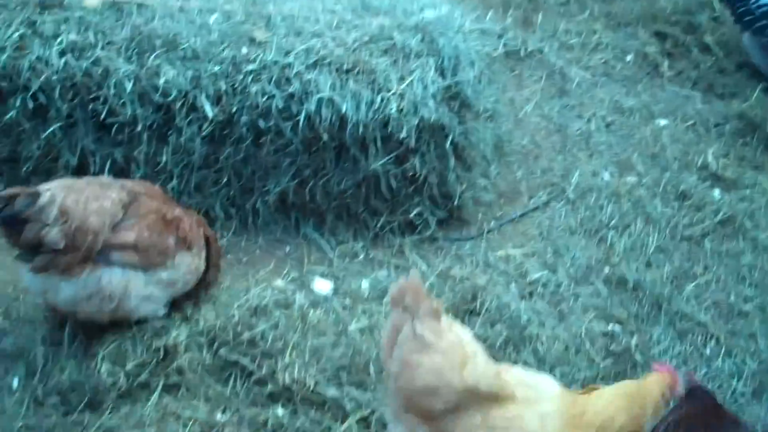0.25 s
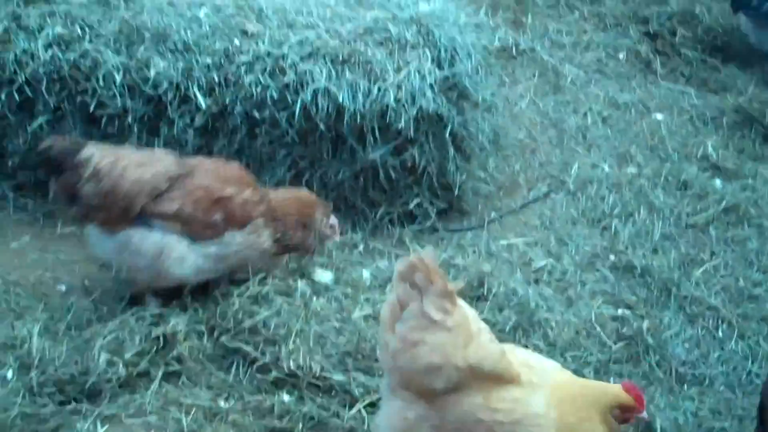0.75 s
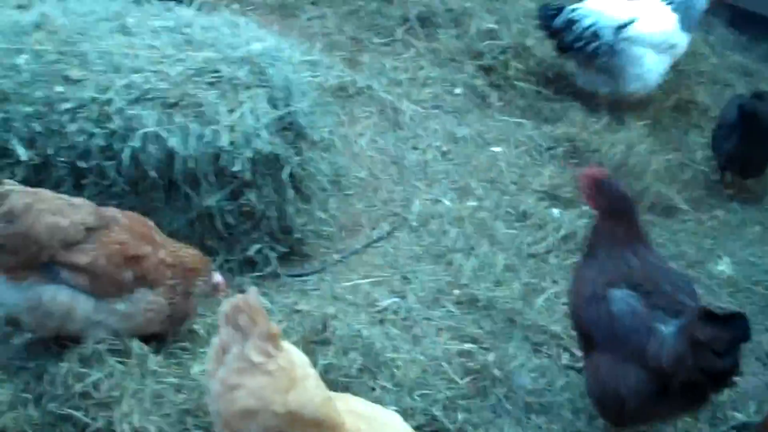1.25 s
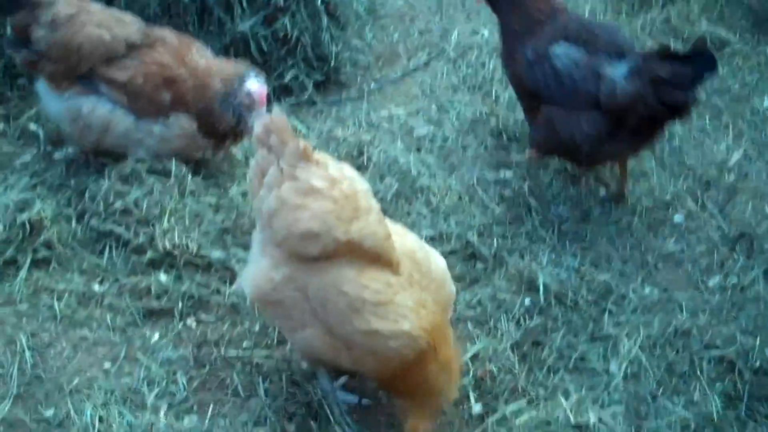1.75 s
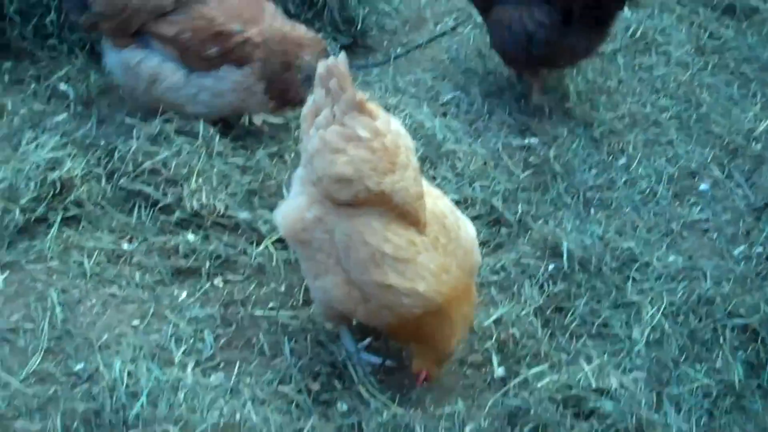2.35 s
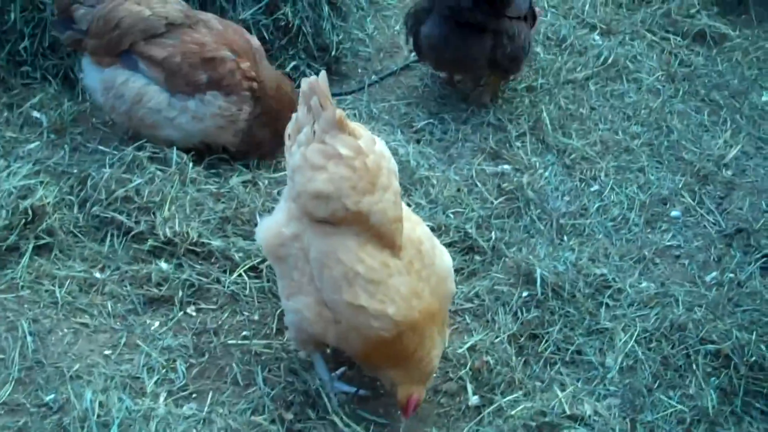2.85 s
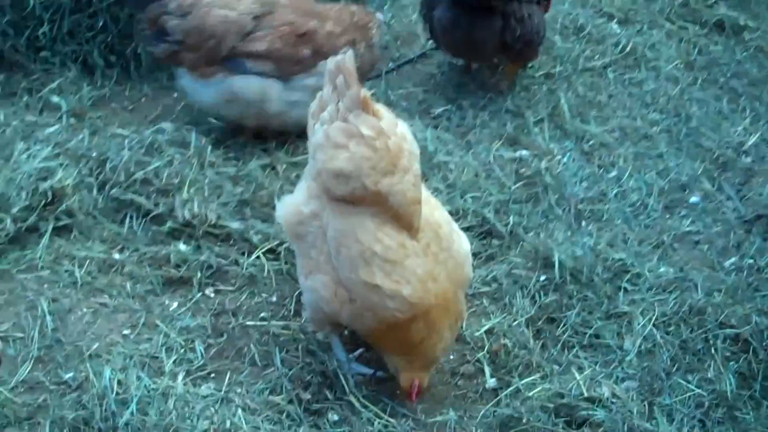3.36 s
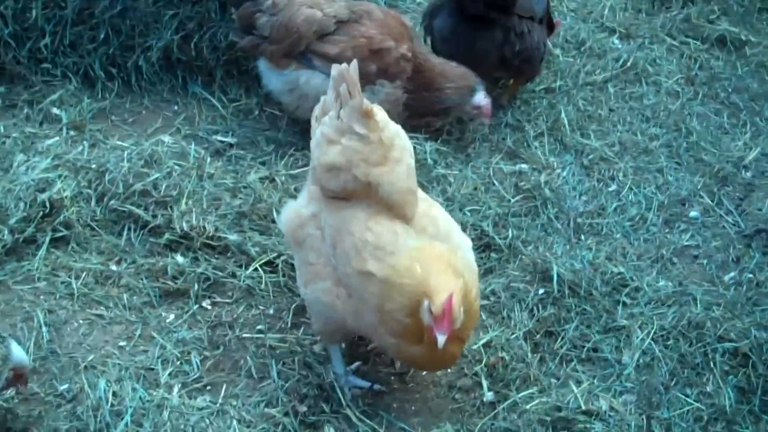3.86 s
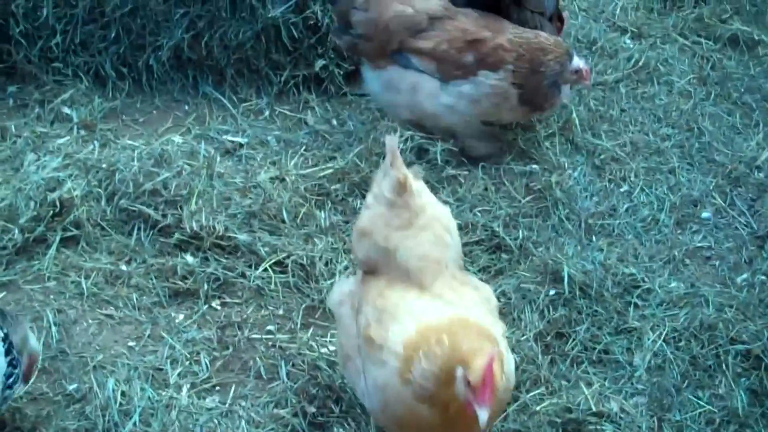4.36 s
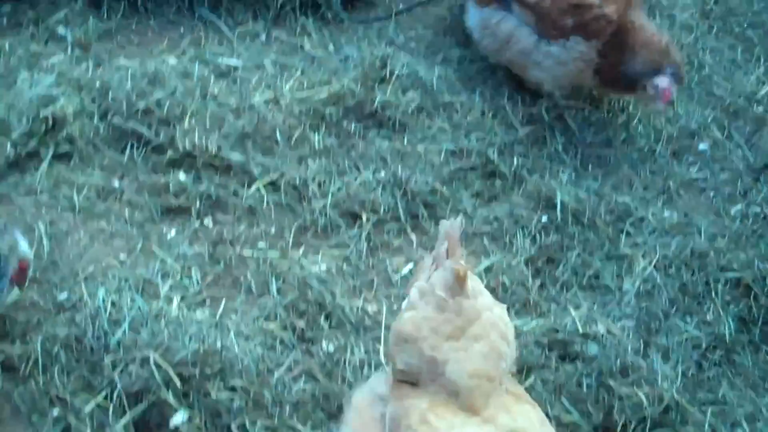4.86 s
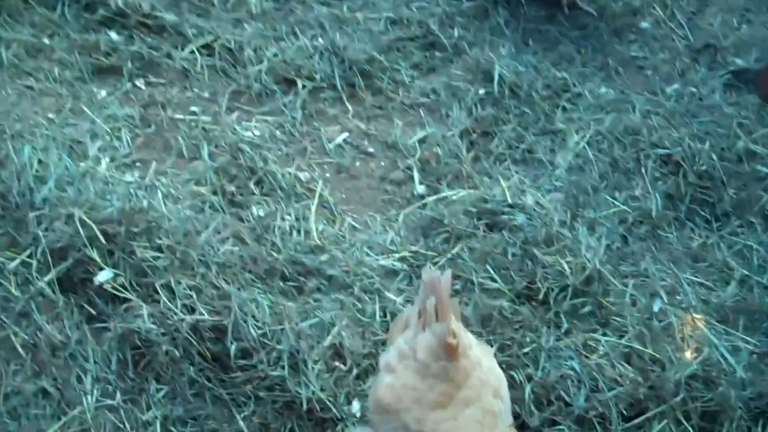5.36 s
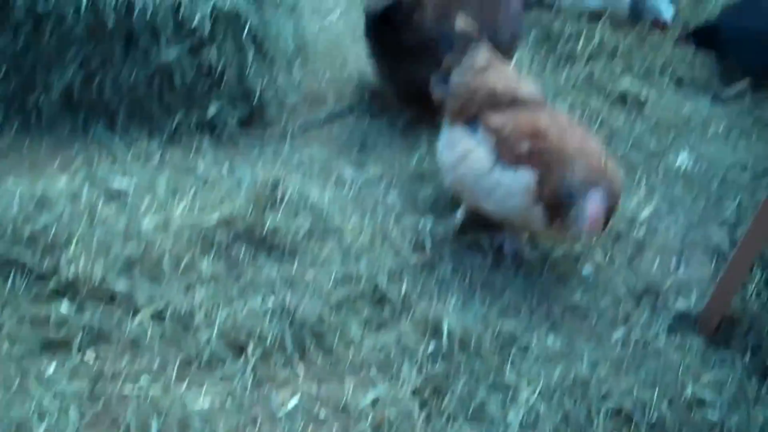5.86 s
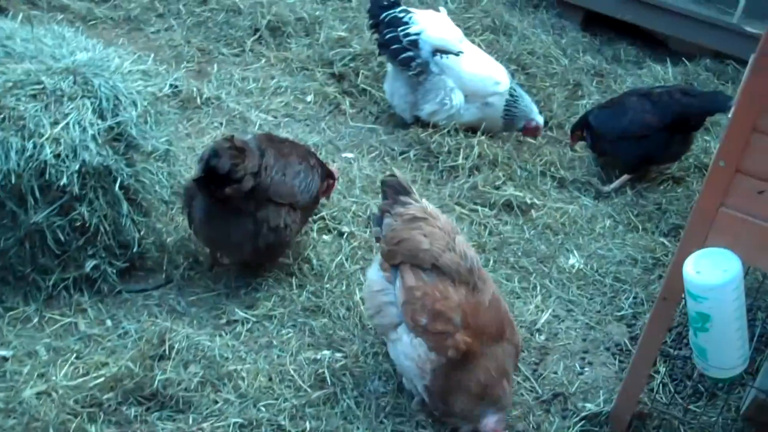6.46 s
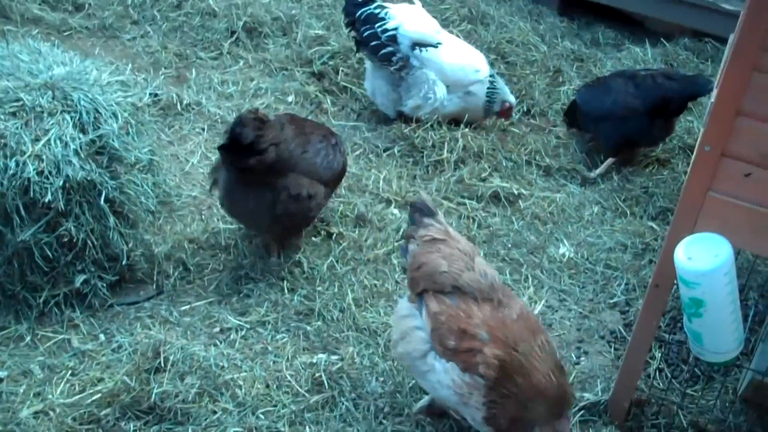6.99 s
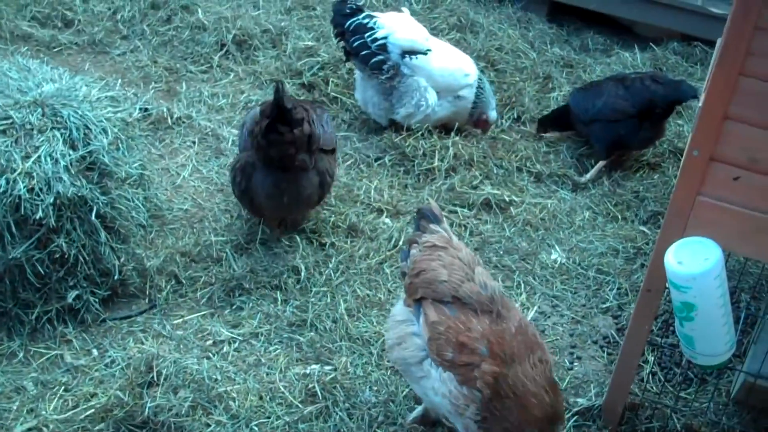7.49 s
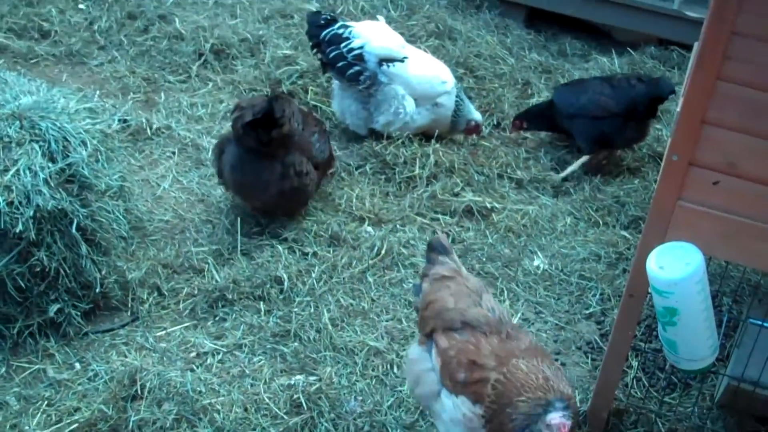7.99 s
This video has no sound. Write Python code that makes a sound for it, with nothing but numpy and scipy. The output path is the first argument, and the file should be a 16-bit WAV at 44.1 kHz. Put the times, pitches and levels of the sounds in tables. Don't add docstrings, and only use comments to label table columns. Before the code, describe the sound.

Hens scratch through crackling hay, giving hoarse barks, a low moan, a sobbing wail and a quick trill, with soft hiss behind.

```python
import sys
import numpy as np
from scipy import signal
from scipy.fft import rfft, irfft
from scipy.io import wavfile
from scipy.ndimage import uniform_filter1d

SR = 44100
rng = np.random.default_rng(int(sys.argv[2]) if len(sys.argv) > 2 else 0)


def volts(x):
    e = np.asarray(x, float) / 20
    return 10 ** e


def digitize_waveform(pressure):
    field = np.atleast_2d(pressure).T
    bounded = np.clip(field, -1, 1)
    quanta = np.round(bounded * 32767).astype(np.int16)
    wavfile.write(sys.argv[1], SR, quanta)


N = 362943
TIME = np.arange(N) / SR
PORT_LAG = 2

STACK = (1, 2, 3, 4)
CLEAR = dict(wobble=.012, shimmer_db=1.4, rough=.13)
PURE = dict(wobble=.006, shimmer_db=.6, rough=.08)


def walk(rate_hz, size=N):
    hold = int(SR / rate_hz)
    steps = np.repeat(rng.standard_normal(size // hold + 1), hold)
    return 1.3 * uniform_filter1d(uniform_filter1d(steps, hold), hold)[:size]


def notes(tables, orders, wobble, shimmer_db, rough):
    rows = np.concatenate(tables)
    a, b = int(rows[0, 0] * SR) - 400, int(rows[-1, 0] * SR) + 400
    size, t = b - a, TIME[a:b]
    gate, out = np.zeros(N), np.zeros(N)
    for table in tables:
        gate[int(table[0][0] * SR):int(table[-1][0] * SR) + 60] = 1
    hz = uniform_filter1d(np.interp(t, rows[:, 0], rows[:, 1]), size=100)
    hz = hz * (1 + wobble * walk(150, size))
    phase = 2 * np.pi * np.cumsum(hz) / SR
    haze = 1 + rough * walk(500, size)
    for k, level_db in zip(orders, rows[:, 2:].T):
        swell = uniform_filter1d(gate[a:b] * np.interp(t, rows[:, 0], volts(level_db)), size=150)
        shimmer = volts(shimmer_db * walk(70, size))
        out[a:b] += np.sqrt(2) * haze * swell * shimmer * np.sin(k * phase)
    return out


def partials(pitch, db, mouth, orders, mouth_width_hz, steep, low_db):
    levels = []
    for k in orders:
        offset = 2 * (k * pitch - mouth) / mouth_width_hz
        levels.append(db + low_db * (k == 1) - steep * 10 * np.log10(1 + offset ** 2))
    return levels


def voice(rows, orders, glide, peak, edge_db, flat, mouth_width_hz, steep, low_db, **steadiness):
    u = np.linspace(0, 1, num=17)
    swell = edge_db * np.where(u < peak, 1 - u / peak, (u - peak) / (1 - peak)) ** flat
    next_starts = [r[0] for r in rows[1:]] + [TIME[-1]]
    tables = []
    for (s, length, hz, db, mouth), after in zip(rows, next_starts):
        t = s + u * min(length, after - s - 1 / SR)
        pitch = hz * (1 + glide(u, hz))
        levels = partials(pitch, db + swell, mouth, orders, mouth_width_hz, steep, low_db)
        tables.append(np.transpose([t, pitch, *levels]))
    return notes(tables, orders, **steadiness)


def lift(by):
    return lambda u, hz: by * u


def breaks(u, hz):
    scoop = .35 * np.exp(-u / .15)
    flip = 1 / (1 + np.exp((.69 - u) / .05))
    return (500 / hz - 1) * (scoop + flip)


def clucks():
    # t/s, f/Hz, level/dB, mouth/Hz
    long_cluck = [(.575, 400, -52, 760), (.597, 347, -30, 700), (.607, 337, -36, 760), (.62, 356, -35, 710),
                  (.64, 352, -38, 710), (.665, 330, -36.5, 850), (.695, 354, -38, 720),
                  (.735, 448, -45, 850), (.757, 455, -62, 880)]
    # t/s, length/s, f/Hz, level/dB, mouth/Hz
    level_clucks = [
        (1.718, .048, 300, -46, 620),
        (1.766, .046, 289, -49, 1150),
        (1.795, .045, 300, -49, 900),
        (1.86, .046, 289, -39.5, 1160),
    ]
    murmurs = [
        (1.764, .058, 324, -51, 650),
        (1.822, .04, 318, -56, 640),
        (5.61, .03, 475, -50, 950),
    ]
    low_barks = [
        (1.5525, .031, 240, -28.5, 770),
        (1.7055, .012, 240, -32, 720),
    ]
    wide = [
        (5.373, .05, 319, -31.5, 1140),
        (5.452, .095, 322, -34.5, 1020),
    ]
    s, hz, db, mouth = np.transpose(long_cluck)
    levels = partials(hz, db, mouth, STACK, mouth_width_hz=190, steep=1.05, low_db=.3)
    out = notes([np.transpose([s, hz, *levels])], STACK, **CLEAR)
    out += voice(level_clucks, STACK, lift(.01), peak=.4, edge_db=-10, flat=3.1, mouth_width_hz=150,
                 steep=.95, low_db=-6, wobble=.015, shimmer_db=2.1, rough=.25)
    out += voice(murmurs, (2, 5), lift(.01), peak=.35, edge_db=-8, flat=2.5, mouth_width_hz=900,
                 steep=.7, low_db=0, **CLEAR)
    out += voice(low_barks, (1, 2, 3, 4, 5, 6, 7), lift(.04), peak=.45, edge_db=-20, flat=2.6,
                 mouth_width_hz=230, steep=1.45, low_db=-6, wobble=.05, shimmer_db=3.5, rough=.5)
    return out + voice(wide, STACK, lift(.005), peak=.27, edge_db=-26, flat=1.1, mouth_width_hz=330,
                       steep=1.4, low_db=-2.5, **CLEAR)


def yelps():
    # t/s, length/s, f/Hz, level/dB, mouth/Hz
    full = [
        (6.965, .05, 362, -28.5, 900),
    ]
    dying = [
        (7.115, .056, 447, -29.5, 910),
    ]
    leading = [
        (7.322, .05, 357, -28.5, 900),
    ]
    out = voice(full, (1, 2, 3, 4, 5), breaks, peak=.74, edge_db=-24, flat=4.5, mouth_width_hz=300,
                steep=1.35, low_db=-6, **CLEAR)
    out += voice(dying, (1, 2, 3), breaks, peak=.46, edge_db=-34, flat=3.1, mouth_width_hz=300,
                 steep=1.5, low_db=-10, **PURE)
    return out + voice(leading, (2, 4), breaks, peak=.76, edge_db=-20, flat=3.5, mouth_width_hz=480,
                       steep=2.9, low_db=-9, **PURE)


def wail():
    # t/s, f/Hz, level/dB
    rough_line = [
        (5.795, 1123, -43),
        (5.805, 1079, -34),
        (5.871, 1051, -35),
        (5.887, 1102, -40),
        (5.9, 1103, -36),
    ]
    # t/s, f/Hz, level/dB
    clear_lines = [
        [(5.9, 1069, -37), (5.908, 1034, -30), (5.922, 1027, -29), (5.944, 1072, -35), (5.962, 1070, -41)],
        [(5.962, 1025, -41), (5.968, 1017, -33), (5.982, 1018, -32), (6.006, 1072, -29), (6.024, 1072, -32),
         (6.045, 1034, -38)],
        [(6.045, 1006, -39), (6.071, 1038, -38), (6.083, 1024, -38), (6.095, 1038, -49), (6.119, 1017, -49),
         (6.135, 1049, -66)],
    ]

    def stack(rows, over_db):
        table = []
        for s, hz, db in rows:
            fourth_db = db - 10 + 1.6 * (db + 40) - 27
            table.append((s, hz / 2, db, fourth_db, *(db + o for o in over_db)))
        return np.array(table)

    rough = notes([stack(rough_line, (-19, -31, -16, -17, -22))], (2, 4, 1, .5, 1.5, 2.5, 3.5),
                  wobble=.014, shimmer_db=1.6, rough=.25)
    clear = notes([stack(rows, (-24,)) for rows in clear_lines], (2, 4, 1),
                  wobble=.005, shimmer_db=.7, rough=.1)
    return rough + clear


def sobs():
    # t/s, length/s, f/Hz, level/dB, mouth/Hz
    sagging = [
        (5.643, .019, 760, -46, 1400),
        (5.662, .038, 680, -24.5, 1220),
        (5.7, .027, 690, -44, 1330),
        (5.724, .047, 665, -27.5, 1180),
    ]
    drone = [
        (5.772, .029, 618, -35, 1240),
    ]
    falling = [
        (6.172, .07, 545, -31.5, 1070),
    ]
    # t/s, f/Hz, level/dB
    under = [(5.613, 800, -59), (5.642, 735, -41), (5.66, 690, -37), (5.677, 640, -60), (5.707, 668, -41),
             (5.74, 600, -62), (5.79, 618, -46), (5.812, 545, -52), (5.98, 510, -58)]
    out = voice(sagging, (2, 3), lambda u, hz: -.13 * (1 - np.exp(-u / .35)), peak=.36, edge_db=-18,
                flat=1.6, mouth_width_hz=260, steep=2.1, low_db=-9, **PURE)
    out += voice(drone, (1, 2, 4), lift(-.01), peak=.3, edge_db=-6, flat=3.5, mouth_width_hz=130,
                 steep=1.2, low_db=-3.5, wobble=.02, shimmer_db=1.4, rough=.28)
    out += voice(falling, STACK, lift(-.19), peak=.16, edge_db=-20, flat=1.3, mouth_width_hz=240,
                 steep=.9, low_db=1.5, **CLEAR)
    return out + notes([under], (1,), **CLEAR)


def trill():
    # t/s, length/s, f/Hz, level/dB
    trill_beats = [
        (7.4, .049, 442, -28.5),
        (7.467, .039, 453, -29),
        (7.52, .043, 466, -29),
        (7.579, .028, 477, -36),
        (7.608, .033, 470, -51),
    ]
    squeak_ratio, squeak_db = 1.42, -46
    beats = [(s, n, hz, db, 2 * hz) for s, n, hz, db in trill_beats]
    ends = [7.374] + [s + n for s, n, *_ in trill_beats]
    squeaks = []
    for end, (s, _, hz, _) in zip(ends, trill_beats[:-1]):
        squeaks.append((end, s - end, squeak_ratio * hz, squeak_db, 2 * squeak_ratio * hz))
    out = voice(beats, (2,), lambda u, hz: .28 * (u - .33) ** 2, peak=.5, edge_db=-19, flat=3.3,
                mouth_width_hz=400, steep=.9, low_db=-9, **PURE)
    out += voice(squeaks[:1], (2,), lambda u, hz: .13 * np.sin(3.0 * u) - .03, peak=.45, edge_db=-4,
                 flat=2.1, mouth_width_hz=600, steep=.9, low_db=-9, **PURE)
    return out + voice(squeaks[1:], (2,), lift(-.1), peak=.55, edge_db=-5, flat=2.1,
                       mouth_width_hz=600, steep=.9, low_db=-9, **PURE)


def moan():
    # t/s, length/s, f/Hz, level/dB, mouth/Hz
    moan_notes = [(1.95, .13, 392, -55, 1180), (2.085, .075, 345, -48, 1040), (2.16, .05, 372, -53, 1130),
                  (2.25, .08, 385, -55, 1150), (2.33, .09, 352, -55, 1060), (2.44, .13, 363, -55, 1090),
                  (2.585, .065, 380, -52, 1140)]
    # t/s, f/Hz, level/dB
    creak = [(1.85, 610, -54), (1.89, 580, -48), (1.905, 620, -38), (1.917, 690, -42), (1.926, 930, -39),
             (1.936, 940, -44), (1.941, 830, -42), (1.952, 800, -60)]
    out = voice(moan_notes, (1, 2, 3, 4, 5), lift(.03), peak=.35, edge_db=-4, flat=2.1, mouth_width_hz=330,
                steep=.9, low_db=-1.5, wobble=.013, shimmer_db=2.5, rough=.35)
    return volts(-1.1) * out + notes([creak], (1,), **CLEAR)


def band(x, hz, width_hz):
    return signal.lfilter(*signal.iirpeak(min(hz, .44 * SR), hz / width_hz, fs=SR), x)


def growls(tables, jitter, scatter_db, breath):
    # f/Hz, width/Hz, level/dB
    throat = [
        [(330, 180, -4), (510, 170, -1), (700, 200, 0)],
        [(900, 180, -2), (1150, 260, 0)],
        [(1500, 240, -3), (1780, 300, 4.5)],
    ]
    pulse_hz = 128
    out = np.zeros(N)
    for table in tables:
        s, db, *over_db = np.transpose(table)
        a, b = int(s[0] * SR), int(s[-1] * SR)
        size, t = b - a, TIME[a:b]
        drift = 1 + .06 * walk(20, size) + jitter * walk(150, size)
        phase = np.cumsum(pulse_hz * drift) / SR
        pulses = np.diff(np.floor(phase), prepend=0) * volts(scatter_db * rng.standard_normal(size))
        air = np.exp(-(phase % 1) / .4) * rng.standard_normal(size)
        source = pulses + breath * air
        fade = signal.windows.tukey(size, 400 / size)
        for modes, part_db in zip(throat, (db, db + over_db[0], db + over_db[1])):
            part = np.zeros(size)
            for k, (f, w, g) in enumerate(modes):
                part += (-1) ** k * volts(g) * band(band(source, f, w), f, w)
            out[a:b] += part / np.std(part) * volts(np.interp(t, s, part_db)) * fade
    return out


def held(rows, attack_s, release_s, edge_db):
    tables = []
    for s, n, db, *over in rows:
        up = min(attack_s, n / 2)
        steps = ((0, edge_db), (up, 0), (max(n - release_s, up + 1 / SR), 0), (n, edge_db))
        tables.append([(s + t, db + d, *over) for t, d in steps])
    return tables


def throaty():
    # t/s, length/s, low throat level/dB, middle over low/dB, upper over low/dB
    hoarse_rows = [
        (1.95, .35, -56, 4, -2),
        (2.3, .355, -58, 1, -1),
        (4.7, .65, -61, 3, 0),
    ]
    rasp_rows = [
        (.58, .18, -57, 2, 3),
        (1.755, .195, -56, 3, -2),
        (5.8, .23, -54, 3, 3),
    ]
    rattle_rows = [
        (.415, .085, -47, 3, -2),
        (.505, .055, -54, 2, -3),
        (2.675, .07, -47, -6, -12),
    ]
    tail_rows = [
        (1.582, .058, -43, 1.5, -14),
        (6.175, .145, -50, 4, 1),
        (7.0, .06, -50, 1, -2),
        (7.152, .04, -47, 1.5, -4),
    ]
    airy_tables = held(rattle_rows, .03, .04, -8) + held(tail_rows, .001, .2, -18)
    airy = growls(airy_tables, jitter=.3, scatter_db=3.0, breath=.55)
    hoarse = growls(held(hoarse_rows, .04, .045, -9), jitter=.02, scatter_db=1.6, breath=.035)
    rasps = growls(held(rasp_rows, .025, .04, -7), jitter=.2, scatter_db=4.0, breath=.08)
    return airy + volts(-1.4) * hoarse + volts(-1.5) * rasps


def burst(hz, width, t60_s, crack, rise_s, dull):
    t = TIME[:4000]
    decay = np.exp(-np.log(1000) * t / max(t60_s, .003))
    x = rng.standard_normal(len(t)) * decay * (1 - np.exp(-t / rise_s))
    x[0] += crack
    y = np.zeros(len(t))
    for k, gain in ((1, 1), (1.55, .25), (.6, .5)):
        y += gain * band(band(x, k * hz, width * hz), k * hz, width * hz)
    y = band(y, hz, dull * hz)
    return y / np.max(np.abs(y))


def place(rows, width, crack, rise_s, dull):
    out = np.zeros(N + 4000)
    for s, db, hz, t60_s in rows:
        a = int(s * SR)
        out[a:a + 4000] += volts(db) * burst(hz, width, t60_s, crack, rise_s, dull)
    return out[:N]


def barks():
    # t/s, peak level/dB, throat f/Hz, t60/s
    boks = [(.4195, -40, 1400, .02), (.4365, -36, 1190, .02), (.4385, -30, 1190, .02),
            (.449, -35, 1000, .02), (.4525, -30, 890, .025), (.4575, -35, 950, .025),
            (.468, -36, 1500, .02), (.487, -39, 1400, .02), (.511, -29, 1140, .018), (.531, -29, 1050, .02),
            (.5355, -33, 1000, .025), (1.5655, -36, 1600, .02), (2.08, -41, 1000, .04),
            (2.192, -42, 900, .025), (3.343, -36, 950, .02)]
    return place(boks, width=.45, crack=22, rise_s=.003, dull=1.3)


def flick():
    start_s, end_s, from_hz, to_hz = 3.3315, 3.354, 500, 5200
    u = (TIME - start_s) / (end_s - start_s)
    inside, past = np.clip(u, 0, 1), np.maximum(u, 0)
    phase = 2 * np.pi * np.cumsum(from_hz + (to_hz - from_hz) * inside) / SR
    sweep = np.sin(np.pi * inside) * np.sin(phase) * (1 + .4 * walk(900))
    settle = (u > .3) * np.exp(-past / 1.4) * band(rng.standard_normal(N), 2600., 1700.)
    thud = (u > 0) * np.exp(-past / .9) * band(rng.standard_normal(N), 750., 500.)
    return volts(-33) * (sweep + 1.5 * settle + 1.2 * thud)


def pen(hens):
    t60_s, echo_db = .16, -15
    pan_db = np.interp(TIME, [0, 2, 5, 6.5, 8], [-.5, -1.5, -2.3, -.3, -4.5])
    direct = np.array([np.roll(hens, PORT_LAG // 2) * volts(pan_db / 2), hens * volts(-pan_db / 2)])
    tail = rng.standard_normal((2, 8000)) * np.exp(-np.log(1000) * TIME[:8000] / t60_s)
    tail = volts(echo_db) * tail / np.sqrt(np.sum(tail[0] ** 2))
    return direct + signal.fftconvolve(hens[None], tail, axes=1)[:, :N]


def snaps():
    # t/s, peak level/dB, f/Hz, t60/s
    stalks = [(.58, -41, 2600, .3), (.435, -44, 2500, .15), (1.0755, -21, 7000, .01),
              (1.3159, -38, 7000, .015), (2.9696, -33, 5500, .02), (4.4608, -43, 6800, .015),
              (6.4712, -32, 6900, .012), (6.7181, -41, 7300, .015), (7.4734, -40, 7600, .015),
              (7.885, -44, 7200, .015), (1.6876, -34, 5000, .015), (1.8507, -41, 6000, .015),
              (2.4743, -36, 4800, .09), (2.585, -38, 3400, .05), (2.7395, -34, 3390, .025),
              (2.968, -34, 4200, .04), (3.165, -38, 1700, .03), (3.341, -33, 7000, .04),
              (3.595, -39, 6800, .06), (3.618, -44, 800, .012), (3.645, -36, 2000, .025),
              (3.6666, -35, 2750, .03), (4.5231, -37, 6500, .02), (5.4196, -29, 6500, .02),
              (6.4078, -24, 6800, .008), (7.5358, -37, 6500, .02), (7.5737, -18.5, 6500, .008),
              (7.5767, -30, 7500, .01), (7.5781, -26, 7500, .008), (7.5816, -25, 7200, .008),
              (7.5897, -31, 6500, .008), (7.609, -34, 5500, .04), (8.2107, -35, 6000, .015)]
    brief = [r for r in stalks if r[3] < 1 / 45]
    longer = [r for r in stalks if r[3] >= 1 / 45]
    x = place(brief, width=.9, crack=5.5, rise_s=.0008, dull=2.2)
    x = x + place(longer, width=.7, crack=1.2, rise_s=.001, dull=1.5)
    x = x + .9 * band(x, 7200., 1300.)
    return np.array([np.roll(x, PORT_LAG // 2) * volts(2.5), x * volts(-1.8)])


def scratching():
    # t/s, level/dB, time to fade 10 dB/s
    scratches = [(0.03, -42.6, 0.19), (0.43, -43.9, 0.28), (0.83, -43.0, 0.16), (1.11, -40.4, 0.21),
                 (1.39, -45.2, 0.07), (1.68, -45.1, 0.16), (1.87, -58.8, 0.17), (2.1, -46.9, 0.21),
                 (2.38, -49.7, 0.18), (2.49, -46.6, 0.05), (2.59, -49.9, 0.12), (2.81, -45.6, 0.17),
                 (3.06, -51.9, 0.1), (3.23, -48.4, 0.08), (3.39, -48.3, 0.22), (3.6, -48.4, 0.47),
                 (3.95, -48.3, 0.16), (4.32, -47.1, 0.12), (4.58, -43.9, 0.08), (4.71, -38.9, 0.08),
                 (5.07, -44.8, 0.53), (5.51, -43.6, 0.22), (5.85, -42.2, 0.21), (6.13, -40.6, 0.15),
                 (6.31, -43.3, 0.27), (6.81, -50.6, 0.17), (7.06, -49.2, 0.29), (7.35, -46.4, 0.15),
                 (7.59, -44.7, 0.11), (8.14, -46.3, 0.21),
                 (1.83, -51, .04),
        (3.6, -44, .03),
        (5.1, -43, .05),
        (5.43, -45, .05),
        (6.5, -49, .06),
        (8.01, -48, .07),
    ]
    still_db = -70
    power = volts(2 * still_db) ** 2 * 0
    for s, db, fade_s in scratches:
        power = power + volts(4 * (db - 10 * abs(TIME - s) / max(fade_s, .02)))
    return 10 * np.log10(np.sqrt(power) + volts(2 * still_db))


def colour(x, points):
    hz, db = np.transpose(points)
    log_f = np.log(np.maximum(np.fft.rfftfreq(N, 1 / SR), 1))
    y = irfft(rfft(x) * volts(np.interp(log_f, np.log(hz), db)), N)
    return y / np.std(y)


def hay():
    # f/Hz, level/dB per Hz
    hay_spectrum = [(710, -27), (1200, -17.5), (2240, -15), (3110, -12), (3560, -11.5), (5210, -10),
                    (7160, -0.5), (9230, -14), (13600, -22.5), (14500, -28.5), (15000, -75)]
    db = scratching() + 1.7 * walk(13)
    shared = rng.standard_normal(N)
    out = []
    for side in (1, -1):
        grains = (rng.random(N) < .05) * rng.standard_normal(N) * volts(1.6 * rng.exponential(size=N))
        hiss = 1.1 * rng.standard_normal(N) + .7 * np.roll(shared, PORT_LAG * (side > 0))
        x = colour(grains / np.std(grains) + hiss, hay_spectrum)
        x = x * volts(.7 * walk(25)) + .2 * volts(4.0 * walk(8)) * band(x, 3600., 2600.)
        x = x + .2 * band(x, 7250., 900.)
        x = x + side * .46 * band(x, 13000., 9000.)
        out.append(x * volts(db + 2.1 + .9 * side))
    return np.array(out)


def yard():
    # f/Hz, level/dB per Hz
    yard_spectrum = [(15, -46), (25, -14), (106, -3), (373, -3), (833, 1.5), (2130, -9.5), (5280, -10.5),
                     (7280, -3.5), (9770, -19.5), (13800, -15), (15000, -47)]
    shared = band(rng.standard_normal(N), 400., 1500.)
    own = rng.standard_normal((2, N))
    own = own - .7 * band(own, 400., 1500.)
    noise = [colour(np.roll(shared, lag) + c, yard_spectrum) for c, lag in zip(own, (PORT_LAG, 0))]
    hum = volts(-79) * np.sin(2 * np.pi * 60 * TIME)
    return np.array(noise) * volts(-56.5 + 3.5 + .8 * walk(1.5)) + hum


def scene():
    hens = clucks() + yelps() + sobs() + wail() + trill() + moan()
    hens = hens + throaty() + barks() + flick()
    return pen(hens) + snaps() + hay() + yard()


def roll_off(x):
    return signal.sosfilt(signal.butter(12, 14300, fs=SR, output="sos"), x)


def record(dry):
    low_pass = signal.ellip(8, .2, 60, 14200, fs=SR, output="sos")
    mix = signal.sosfilt(low_pass, dry)
    return roll_off(mix)


dry = scene()
out = record(dry)
digitize_waveform(out)
```